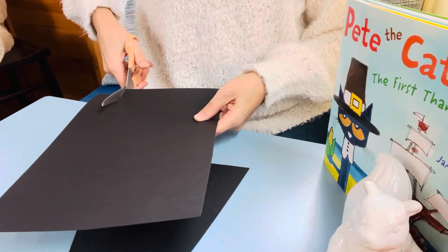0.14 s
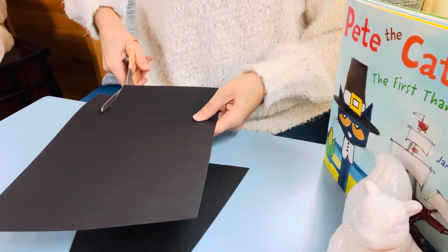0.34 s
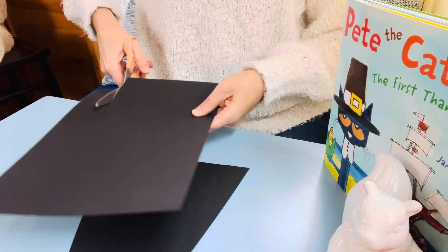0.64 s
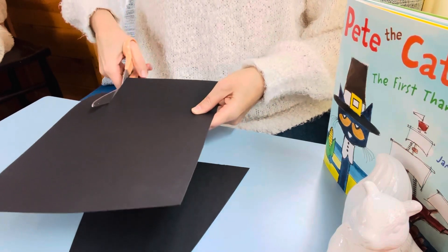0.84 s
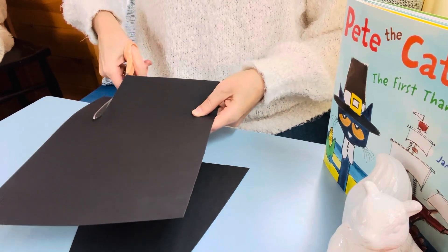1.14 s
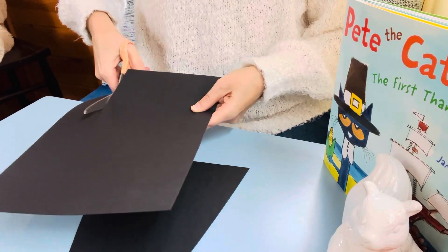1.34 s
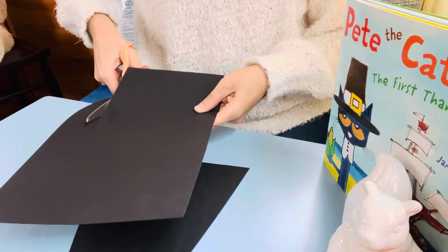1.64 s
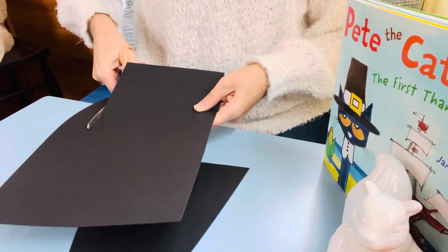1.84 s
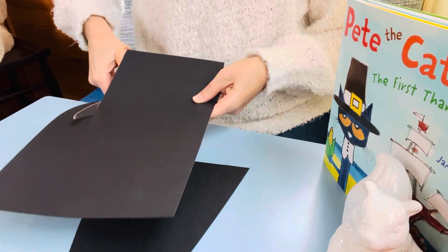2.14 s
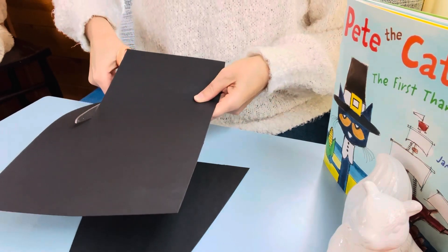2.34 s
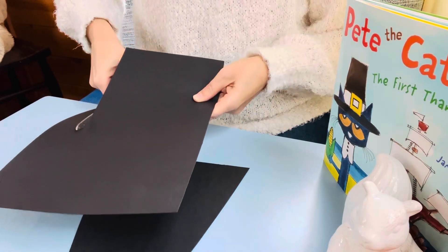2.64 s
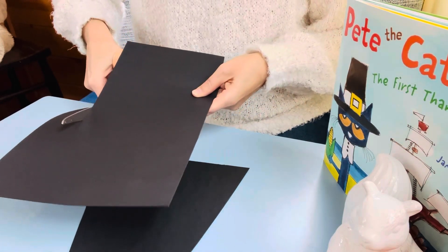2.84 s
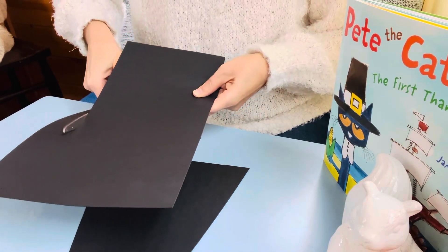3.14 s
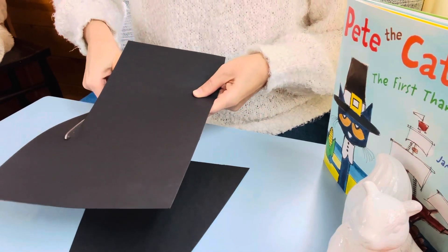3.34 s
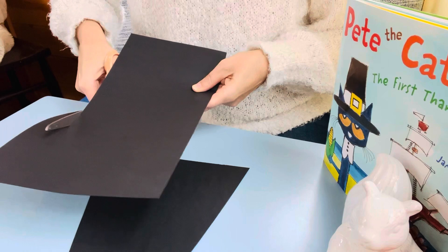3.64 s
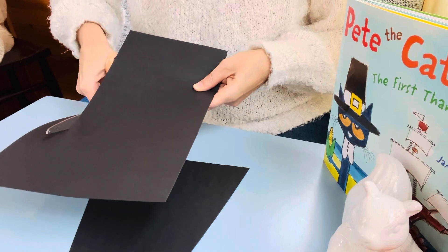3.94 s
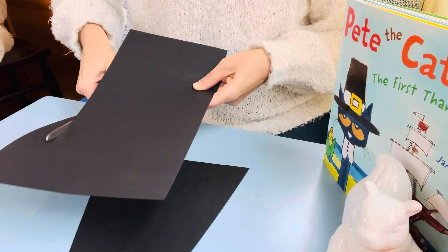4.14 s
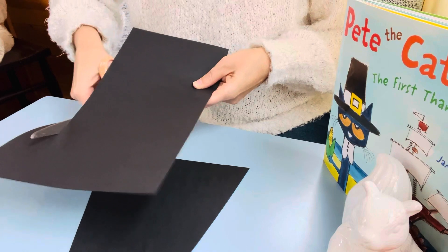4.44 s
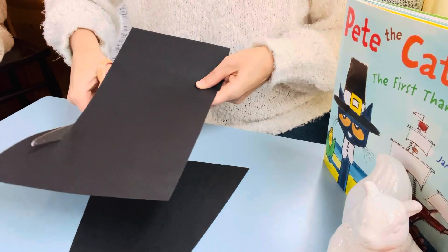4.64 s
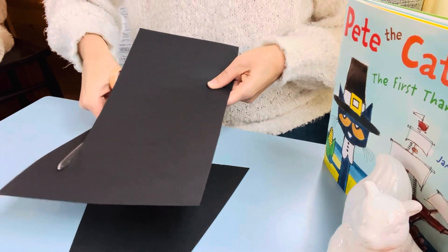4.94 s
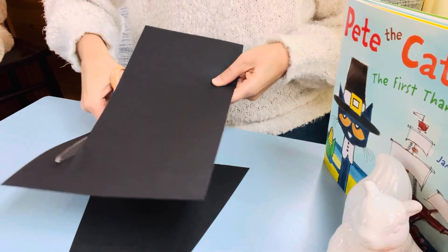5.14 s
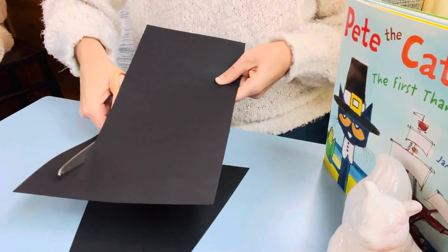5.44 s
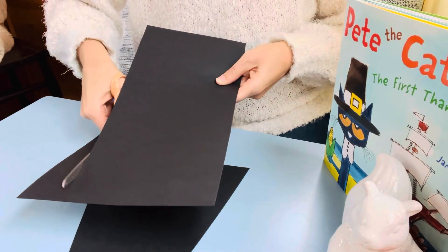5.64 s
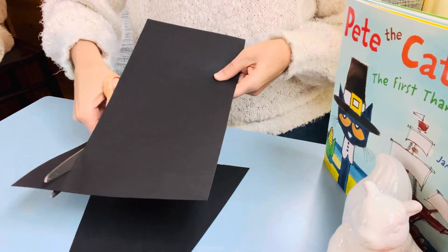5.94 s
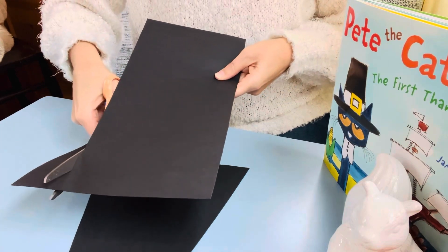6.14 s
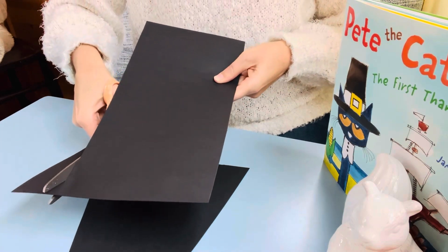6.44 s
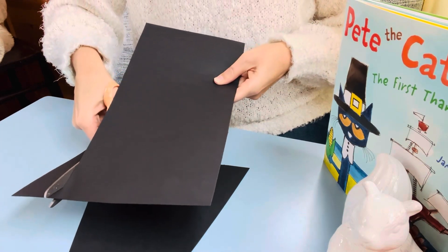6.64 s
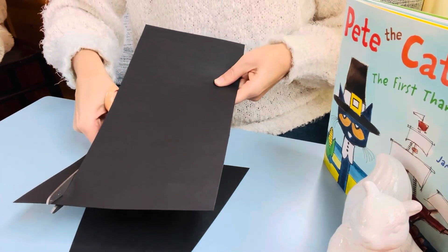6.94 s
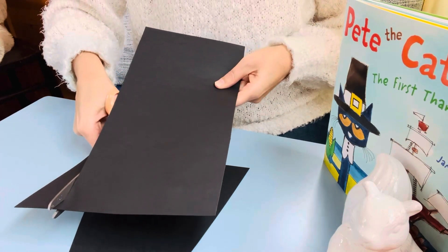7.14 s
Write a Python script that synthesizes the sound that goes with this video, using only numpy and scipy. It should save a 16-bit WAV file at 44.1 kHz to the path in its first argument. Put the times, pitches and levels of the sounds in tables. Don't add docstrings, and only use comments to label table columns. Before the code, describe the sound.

In a small quiet room, blades crunch through a sheet of card stroke after stroke, then the tips snap shut sharply and the corner rustles.

```python
import sys
import numpy as np
from scipy import signal
from scipy.fft import rfft, irfft, next_fast_len
from scipy.io import wavfile
from scipy.ndimage import uniform_filter1d

SR = 44100
rng = np.random.default_rng(int(sys.argv[2]) if len(sys.argv) > 2 else 0)


def bounce(signal):
    frames = np.transpose(np.atleast_2d(signal))
    limited = np.clip(frames, -1, 1)
    pcm = np.round(limited * 32767).astype(np.int16)
    wavfile.write(sys.argv[1], SR, pcm)


def attenuation_scalar(level_db):
    decades = np.asarray(level_db, float) / 20
    return 10 ** decades


N = 322371
T = np.arange(N) / SR

# f/Hz, level/dB per Hz
ROOM_TONE = [(30, -46.5), (42, -3), (76, -1.5), (95, 3), (142, -2.5), (190, -3.5), (260, -12), (322, -14.5),
             (485, -27.5), (1000, -35.5), (3100, -41), (7400, -52), (11000, -72.5), (14300, -69),
             (15300, -82)]
# f/Hz, level/dB rms
MAINS_HUM = [(240, -62.5)]
# t/s, firing band level/dB, second line level/dB
ENGINE_LEVELS = [
    (0.0, -64.5, -63),
    (0.49, -77.5, -67.5),
    (1.69, -54, -69),
    (3.81, -64.5, -60.5),
    (7.0, -62.5, -68.5),
    (7.31, -56, -51.5),
]
# t/s, f/Hz
ENGINE_PITCH = [
    (0, 206.7),
    (2.5, 196.3),
    (3.5, 189.6),
    (5.3, 163.7),
    (7.31, 164),
]
# f/Hz, side minus mid level/dB
DIFFUSE_WIDTH = [(100, -13.5), (300, 8), (1200, -3), (3000, -0.5), (6000, 2.5), (9500, -8.5)]

# f/Hz, width f/Hz, level/dB
SHEET_MODES = [(300, 31, 5), (563.3, 8.8, -2.5), (725.6, 18, 7), (772.2, 18.3, 4), (918, 7.6, 0.5),
               (1209, 5.9, -4), (1800, 20, -19), (2920, 16, -32), (3587, 94, -42)]
# f/Hz, level/dB per Hz
CARD_COLOUR = [(200, -36.5), (350, -34), (560, -5), (780, 0), (1240, 2), (2200, -7.5), (5000, -24),
               (7000, -44)]
# f/Hz, level/dB per Hz
SCRAPE_COLOUR = [(1300, -12), (1900, -4), (2650, -1), (3500, -1.5), (4700, -3), (5800, -15), (7500, -41)]
# f/Hz, level/dB per Hz
STEEL_COLOUR = [(3500, -66), (5000, -8), (5800, -4), (7000, -7), (8500, -7), (10500, -8.5), (12000, -10.5),
                (14000, -4.5), (15500, 8.5), (16100, -42)]
# f/Hz, level/dB per Hz
TIPS_COLOUR = [(800, -12.5), (1500, -13), (2700, 1), (3800, -1), (4700, 8.5), (5800, -8), (7300, -7.5),
               (9500, 2), (11500, -4), (13500, 7), (15500, 3), (16200, -51.5)]

# start t/s, length t/s, pressure level/dB, sag over the stroke level/dB, brightness level/dB
CLOSING_STROKES = [(0.015, 0.053, -63, -0.5, -3), (0.148, 0.25, -55, -6.5, 4), (0.862, .21, -57, -5.5, 5),
                   (1.558, 0.27, -41.5, 27.5, 3), (2.283, .22, -42, 6, -1.5), (3.043, 0.042, -46, 5, 4),
                   (3.136, 0.084, -45, 19.5, 2), (3.248, 0.069, -41.5, 5.5, 0), (3.845, 0.11, -56, 13, 2.5),
                   (4.001, .17, -53.5, -1, 5), (4.745, 0.16, -47.5, 7, 6), (5.509, 0.17, -50.5, 12, 5),
                   (6.214, 0.33, -65, 21, 10), (7.2, 0.09, -50.5, -10.5, 6)]
# t/s, peak level/dB, flap f/Hz, steel crackle re peak level/dB
LIGHT_CATCHES = [(0.035, -42.5, 1830, -21), (0.066, -47.5, 730, -23), (0.153, -37, 1200, -3.5),
                 (0.231, -34.5, 1170, -6), (0.256, -35.5, 1180, -8), (0.658, -44, 780, -13),
                 (0.896, -43, 710, -7), (1.588, -31.5, 1040, -10), (1.622, -34, 752, -11),
                 (1.648, -32, 730, -6.5), (1.824, -29.5, 716, -13.5), (2.314, -32, 750, -25),
                 (2.333, -28, 830, -8.5), (2.405, -27.5, 960, -15), (2.43, -28, 908, -18),
                 (2.602, -38.5, 744, -4.5), (2.873, -43.5, 1220, -16), (2.995, -40, 830, -10.5),
                 (3.162, -32, 780, -16), (3.243, -31.5, 890, -14), (3.284, -32, 680, -13),
                 (3.741, -37, 624, -40), (3.84, -39, 780, -12), (3.921, -36, 1090, -14.5),
                 (4.374, -27.5, 1210, -14.5), (4.809, -30, 736, -8), (4.885, -28.5, 750, -10),
                 (5.215, -34.5, 521, -11), (5.511, -34.5, 710, -6), (5.638, -33, 1490, -6.5)]
# t/s, peak level/dB, flap f/Hz, steel crackle re peak level/dB
HARD_JERKS = [(0.273, -29.5, 750, -8), (0.335, -27, 766, -10.5), (0.388, -28.5, 930, -10.5),
              (0.556, -29, 1172, -3), (0.936, -31.5, 797, -7.5), (0.957, -27, 1170, -14),
              (0.985, -27, 798, -12), (1.049, -26, 996, -7), (1.672, -24.5, 697, -21),
              (1.698, -25.5, 1120, -12.5), (1.759, -23, 975, -9.5), (1.773, -26.5, 834, -16),
              (2.351, -32, 784, -25), (2.397, -25.5, 930, -18.5), (2.456, -27, 1246, -10.5),
              (2.486, -26, 1210, -21), (3.039, -25, 765, -13), (3.128, -21.5, 787, -19),
              (3.139, -25.5, 795, -24), (3.261, -25.5, 710, -8), (3.636, -28.5, 618, -20),
              (3.988, -26.5, 678, -11), (4.06, -25.5, 713, -10.5), (4.105, -27.5, 1800, -10),
              (4.138, -30, 1830, -27), (4.489, -26.5, 565, -16), (4.775, -23.5, 2090, -10),
              (4.846, -24.5, 930, -17), (4.928, -29.5, 773, -11.5), (5.539, -28, 704, -8.5)]
# t/s, peak level/dB, flap f/Hz, steel crackle re peak level/dB
SLOW_NIBBLES = [(1.286, -35, 1821, -3), (2.287, -33.5, 1091, -17), (2.299, -33, 1160, -6),
                (2.364, -30.5, 800, -15), (3.06, -24.5, 770, -16), (4.092, -30, 791, -29),
                (5.563, -31, 617, -17), (5.587, -32, 678, -11.5), (5.617, -35, 714, -20),
                (5.65, -31, 639, -25), (6.212, -54.5, 1115, 8.5), (6.226, -43, 740, -2.5),
                (6.27, -46, 629, -5.5), (6.324, -34.5, 727, -8.5), (6.339, -34, 577, -15),
                (6.4, -34.5, 590, -8.5), (6.49, -37, 793, -7), (6.625, -39, 1263, -7.5),
                (6.638, -42.5, 580, -25), (6.663, -40.5, 730, -7.5), (6.742, -44.5, 727, -41),
                (7.203, -36.5, 812, -12), (7.229, -36, 794, -14), (7.249, -36.5, 1318, 0)]
# start t/s, length t/s, pressure level/dB, sag level/dB, brightness level/dB
OPENING_STROKES = [
    (0.54, 0.13, -49.5, -0.5, 4),
    (1.227, 0.14, -46, 9.5, 3.5),
    (1.948, .14, -43.5, 6.5, -0.5),
    (2.658, 0.17, -39, 20, -1.5),
    (2.865, 0.048, -47, 8.5, -2.5),
    (3.437, 0.19, -45, 6.5, -2.5),
    (4.337, 0.16, -42, 13, 0.5),
    (5.08, 0.14, -48.5, 5.5, 2.5),
    (5.822, 0.15, -51.5, 16, 9),
    (6.622, 0.11, -60.5, 4, -5),
]
# start t/s, length t/s, pressure level/dB, sag level/dB, brightness level/dB
HAND_SHIFTS = [
    (2.55, 0.051, -74.5, 15, 13.5),
    (4.255, .02, -72, 4, -19),
    (4.55, 0.17, -69.5, 6, 6.5),
    (5.3, 0.061, -88, 4.5, 21),
    (7.09, 0.021, -101, 3, 15),
]
# t/s, peak level/dB, burst length t/ms, sheet share level/dB
TIP_SNAPS = [
    (7.2643, -18.5, 1.5, -5.5),
    (7.268, -1.5, 0.96, -42),
    (7.282, -18.5, 2.7, -13.5),
]
# start t/s, length t/s, pressure level/dB, sag level/dB, brightness level/dB
CORNER_RUSTLE = [
    (7.275, 0.032, -42.5, 7.5, -3.5),
]

# f/Hz, left minus right level/dB
PORT_TILT = [(60, -10), (110, -3), (200, -12), (380, -2), (700, -3), (1290, -1.5), (2380, -1.5),
             (4400, -4.5), (8120, -1.5), (15000, -0.5)]
# f/Hz, level/dB
CENTRE_THINNING = [(12300, 1.5), (13600, -3.5), (16000, -9.5)]

REST_DB, LEAN_DB, LEAN_S = -90.5, 17.5, 0.059
SWELL_S, RELEASE_S = 0.033, 0.081
CHATTER_GAP_S, CHATTER_DB, CHATTER_HZ, CRACKLE_DB = 0.016, 12.5, 879, -11.5
CLEAR_S = 0.009
STICK_DB, SLIDE_DB, SLIDE_MS = -11, -1.5, 9
BURST_MS, BURST_SPREAD = 2.26, 0.25
TAIL_DB, STEEL_TAIL_DB, TAIL_MS = -12.5, -18, 16.7


def unit(x):
    return x / np.sqrt(np.mean(x ** 2) + 1e-20)


def shape(points, size):
    hz, db = np.transpose(points)
    grid_hz = np.arange(size // 2 + 1) * SR / size
    return attenuation_scalar(np.interp(np.log(grid_hz + 1), np.log(hz + 1), db))


def through(x, response):
    return signal.fftconvolve(x, response)[:len(x)]


def ring(hz, width_hz, size=4096):
    t = np.arange(size) / SR
    decay = np.exp(-np.pi * max(width_hz, 5) * t)
    return np.sin(2 * np.pi * hz * t) * decay * np.sqrt(width_hz / SR)


def walk(rate):
    steps = rng.standard_normal(2000)[np.minimum(T * rate, 1999).astype(int)]
    return 1.09 * uniform_filter1d(steps, int(SR / rate))


def pair(size):
    mid, side = rfft(rng.standard_normal((2, size)))
    side = side * shape(DIFFUSE_WIDTH, size)
    return irfft([mid + side, mid - side], size)


def background():
    size = next_fast_len(N)
    tone = irfft(rfft(pair(size)) * shape(ROOM_TONE, size), size)[:, :N]
    tone = unit(tone) * attenuation_scalar(-57.5 + 0.53 * walk(0.5))
    s, firing_db, line_db = np.transpose(ENGINE_LEVELS)
    line_hz = np.interp(T, *np.transpose(ENGINE_PITCH)) * (1 + 0.016 * walk(14))
    line = np.sin(2 * np.pi * np.cumsum(line_hz) / SR)
    firing = unit(through(rng.standard_normal(N), ring(96.6, 12.2, size=16384)))
    engine = attenuation_scalar(np.interp(T, s, firing_db)) * firing
    engine = engine + attenuation_scalar(np.interp(T, s, line_db) + 3.3 * walk(12)) * line
    hum = sum(attenuation_scalar(db) * np.sin(2 * np.pi * hz * T) for hz, db in MAINS_HUM)
    return tone + engine + hum


def causal(points, size=1024):
    cep = irfft(np.log(shape(points, size)))
    cep[1:size // 2] *= 2
    cep[size // 2 + 1:] = 0
    return unit(irfft(np.exp(rfft(cep)))) / np.sqrt(size)


def sheet(modes_db):
    rings = sum((-1) ** k * attenuation_scalar(db) * ring(hz, width) for k, (hz, width, db) in enumerate(SHEET_MODES))
    return attenuation_scalar(modes_db) * rings / np.linalg.norm(rings) + np.pad(causal(CARD_COLOUR), (0, 3072))


def burst(noise, ms, rise_ms):
    t_ms = np.arange(len(noise)) * 1000 / SR
    return noise * (1 - np.exp(-t_ms / max(rise_ms, 0.1))) ** 2 * np.exp(-t_ms / max(ms, 0.2))


def add(out, s, db, sound):
    start = int(s * SR)
    piece = sound[:N - start]
    out[start:start + len(piece)] += attenuation_scalar(db) * piece / np.max(np.abs(sound))


def stroke(rows, attack_s, scrape_db, hiss_db, bite_db=0):
    gains = np.zeros((3, N))
    for s, length, db, sag_db, bright_db in rows:
        swell = min(SWELL_S, length / 2)
        times = s + np.array([-attack_s - LEAN_S, -attack_s, 0, swell, length, length + RELEASE_S])
        for gain, share_db in zip(gains, (0, scrape_db + bright_db, hiss_db + bright_db)):
            top = db + share_db
            levels = [REST_DB, REST_DB + LEAN_DB, top + bite_db, top, top - sag_db, REST_DB]
            gain += attenuation_scalar(np.interp(T, times, levels, -200, -200))
    return gains


def sliding(rows):
    kicks = np.zeros(N)
    kicks[(np.array(rows)[:, 0] * SR).astype(int) % N] = 1
    slide = np.abs(through(kicks, burst(np.ones(4000), SLIDE_MS, rise_ms=0.5)))
    return attenuation_scalar(STICK_DB) + attenuation_scalar(SLIDE_DB) * np.minimum(slide, 1)


def rubbing(rows):
    closing = stroke(CLOSING_STROKES, 0.009, scrape_db=-16.5, hiss_db=-10.5) * sliding(rows)
    opening = stroke(OPENING_STROKES, 0.006, scrape_db=-4, hiss_db=-3, bite_db=-8.5)
    shifting = stroke(HAND_SHIFTS, 0.012, scrape_db=-7.5, hiss_db=-15.5)
    rustle = stroke(CORNER_RUSTLE, 0.0064, scrape_db=-34, hiss_db=21.5)
    gains = closing + opening + shifting + rustle + attenuation_scalar(REST_DB)
    catch_db = 2.38 * np.minimum(rng.exponential(size=N), 6.5) + 1.54 * walk(60)
    colours = sheet(modes_db=-14.5), causal(SCRAPE_COLOUR), causal(STEEL_COLOUR)
    out = 0
    for gain, colour in zip(gains, colours):
        grain = unit(rng.standard_normal(N) * attenuation_scalar(catch_db + 1.17 * walk(35)))
        out = out + through(gain * attenuation_scalar(-2) * grain, colour)
    return out


def chatter():
    rows = []
    draws = rng.standard_normal((len(CLOSING_STROKES), 3, 20))
    for (s, length, db, sag_db, bright_db), (gap, size, pitch) in zip(CLOSING_STROKES, draws):
        late = np.cumsum(CHATTER_GAP_S * np.exp(0.5 * gap))
        peak_db = db - sag_db * late / length + CHATTER_DB + 3 * size
        flap_hz = CHATTER_HZ * np.exp(0.2 * pitch)
        crackle_db = np.full(20, CRACKLE_DB + bright_db)
        rows += list(np.transpose([s + late, peak_db, flap_hz, crackle_db])[late < length])
    firm = np.array(HARD_JERKS + SLOW_NIBBLES + LIGHT_CATCHES)[:, 0]
    return [row for row in rows if np.min(np.abs(firm - row[0])) > CLEAR_S]


def slips(rows):
    out, card = np.zeros(N), sheet(modes_db=-3)
    steel = causal(STEEL_COLOUR) + causal(SCRAPE_COLOUR)
    noise = rng.standard_normal((200, 2, 3000))
    lengths_ms = BURST_MS * np.exp(BURST_SPREAD * rng.standard_normal(200))
    for (s, db, hz, crackle_db), (low, high), ms in zip(rows, noise, lengths_ms):
        push = burst(np.sin(2 * np.pi * hz * T[:len(low)]), 1.4 * ms, rise_ms=0.59)
        swing = through(push, ring(hz, 0.13 * hz))
        tear = burst(low, ms, rise_ms=1.02) + attenuation_scalar(TAIL_DB) * burst(low, TAIL_MS, rise_ms=2.0)
        shake = through(tear, card)
        crackle = burst(high, 0.79 * ms, rise_ms=1.56)
        crackle = crackle + attenuation_scalar(STEEL_TAIL_DB) * burst(high, TAIL_MS, rise_ms=3.4)
        start = s - 0.0035
        add(out, start, db - 1.5, unit(shake) + attenuation_scalar(-1.5) * unit(swing))
        add(out, start, db + crackle_db + 2, through(crackle, steel))
    return out


def lean_bass(x):
    return signal.sosfilt(signal.butter(3, 400, "high", fs=SR, output="sos"), x)


def table(x):
    hop = 8192
    out, padded = np.zeros((2, N + 4 * hop)), np.pad(x, (hop, 2 * hop))
    t = np.arange(2048) / SR
    for start in range(0, N + hop, hop):
        near = pair(len(t)) * attenuation_scalar(-60 * t / 0.025)
        piece = padded[start:start + 2 * hop] * np.hanning(2 * hop)
        echo = signal.fftconvolve(piece[None], near / np.linalg.norm(near[0]), axes=1)
        out[:, start:start + echo.shape[1]] += echo
    return attenuation_scalar(-3) * out[:, hop:hop + N]


def room(x):
    low_t60_s, treble_t60_s = 0.22, 0.22
    t = np.arange(SR // 2) / SR
    noise = pair(len(t))
    low = signal.lfilter(*signal.butter(1, 2500, fs=SR), noise)
    treble = attenuation_scalar(-24.5) * (noise - low)
    tail = low * attenuation_scalar(-60 * t / low_t60_s) + treble * attenuation_scalar(-60 * t / treble_t60_s)
    tail *= 1 - np.exp(-t / 0.0017)
    return attenuation_scalar(-13) * np.array([through(x, side / np.linalg.norm(tail[0])) for side in tail])


def snaps():
    out, noise = np.zeros(N), rng.standard_normal((len(TIP_SNAPS), 2, 4000))
    for (s, db, ms, sheet_db), (high, low) in zip(TIP_SNAPS, noise):
        add(out, s, db, through(burst(high, ms, rise_ms=1.0), causal(TIPS_COLOUR)))
        add(out, s, db + sheet_db, through(burst(low, 1.1 * ms, rise_ms=0.57), sheet(modes_db=0)))
    return out


def ports(x):
    size, lead_s = next_fast_len(N + 64), 104e-6
    hz = np.arange(size // 2 + 1) * SR / size
    gain = np.sqrt(shape(PORT_TILT, size)) * np.exp(1j * np.pi * hz * lead_s)
    left, right = rfft(x, size) * np.array([gain, 1 / gain])
    mid = (left + right) / 2 * shape(CENTRE_THINNING, size)
    side = (left - right) / 2
    return irfft([mid + side, mid - side], size)[:, :N]


def scene():
    rows = HARD_JERKS + SLOW_NIBBLES + LIGHT_CATCHES + chatter()
    cutting = lean_bass(slips(rows) + rubbing(rows))
    snap = snaps()
    return cutting + table(cutting) + snap + room(cutting + snap) + background()


def top_cut(x):
    return signal.sosfilt(signal.butter(12, 16670, fs=SR, output="sos"), x)


def record(dry):
    ceiling = 1.2
    mix = ceiling * np.tanh(ports(dry) / ceiling)
    return top_cut(mix)


dry = scene()
out = record(dry)
bounce(out)
```